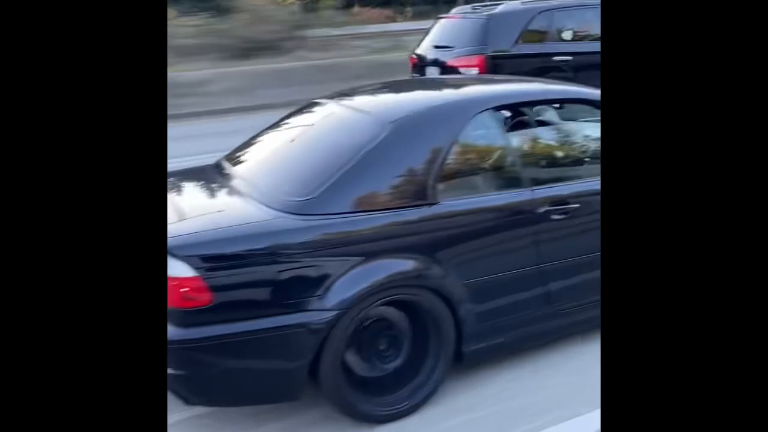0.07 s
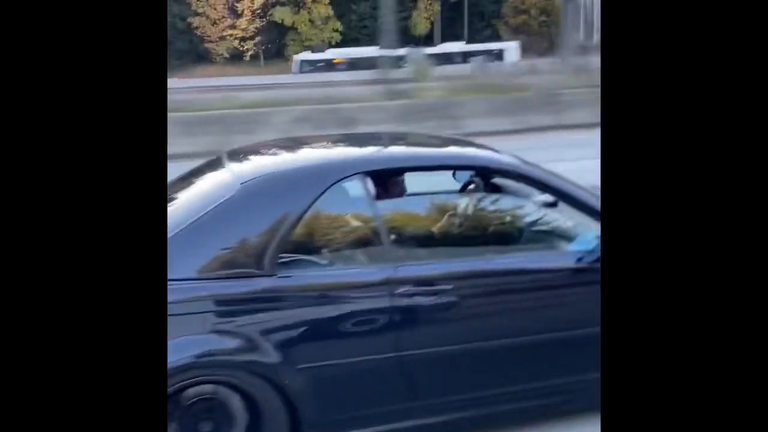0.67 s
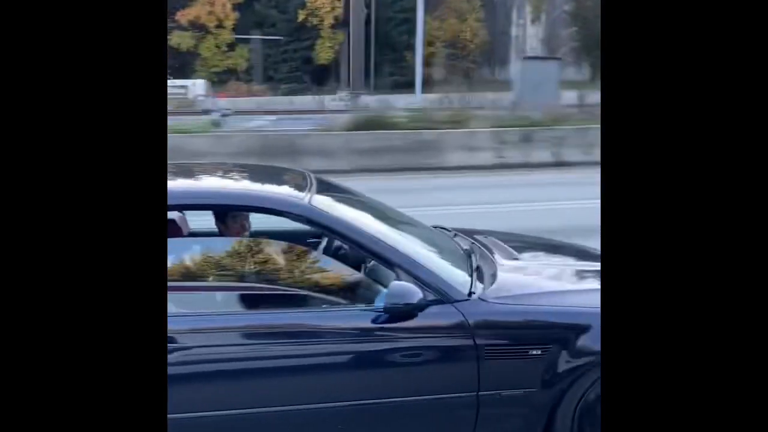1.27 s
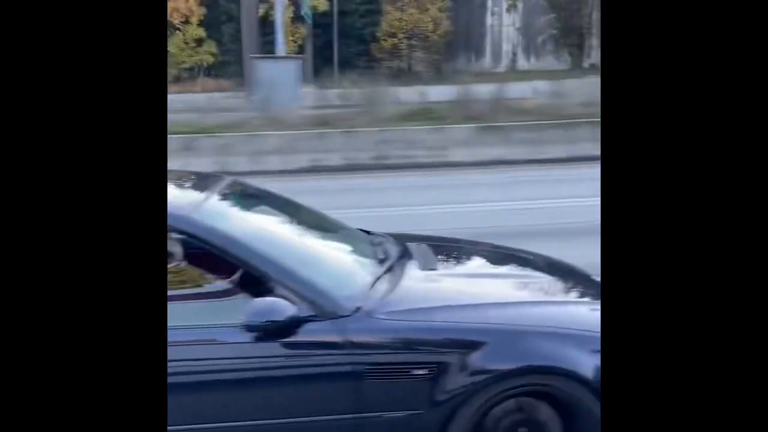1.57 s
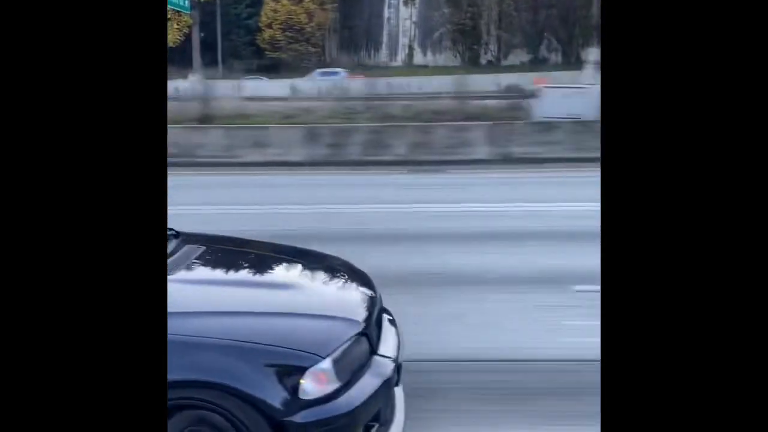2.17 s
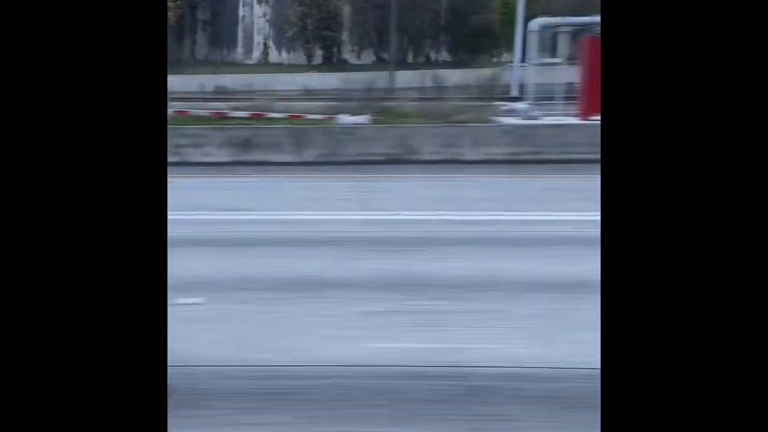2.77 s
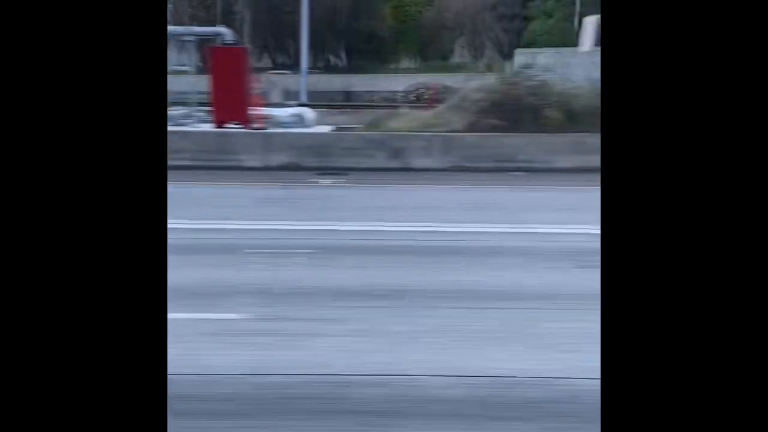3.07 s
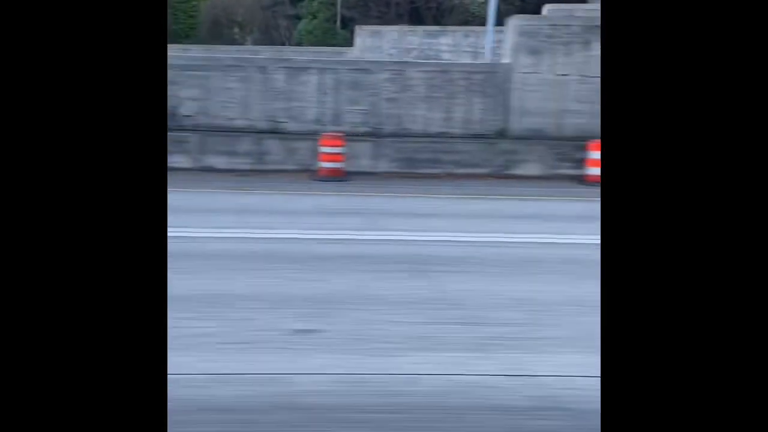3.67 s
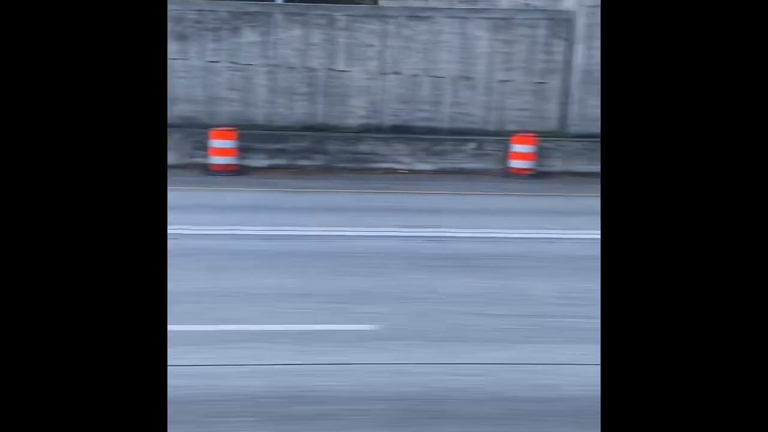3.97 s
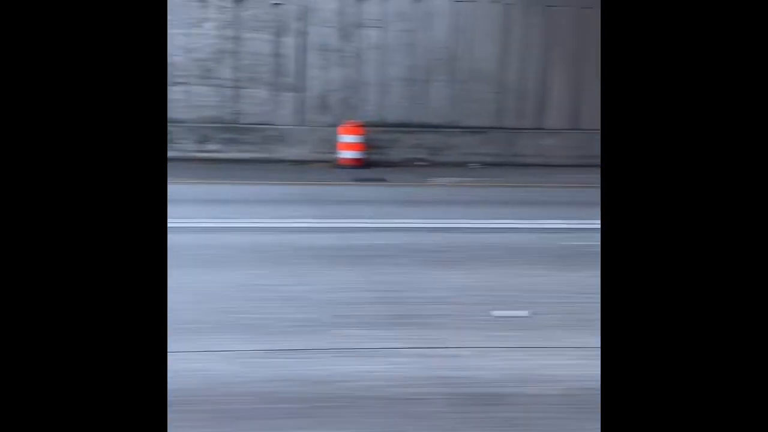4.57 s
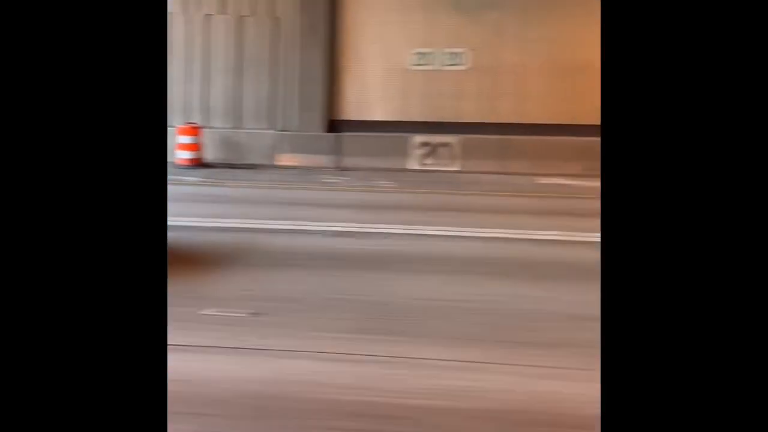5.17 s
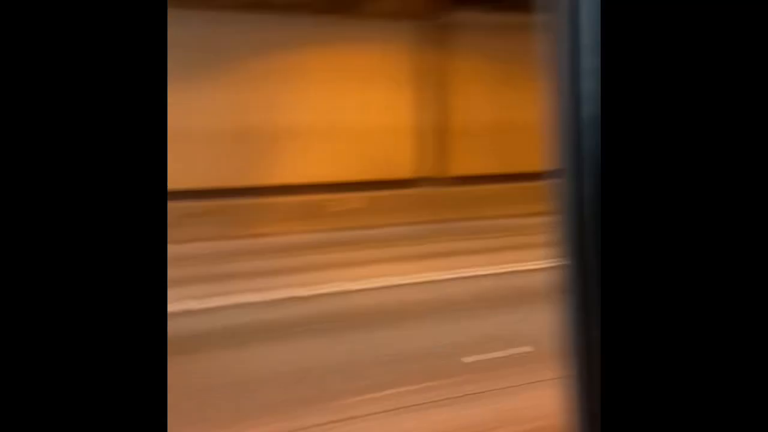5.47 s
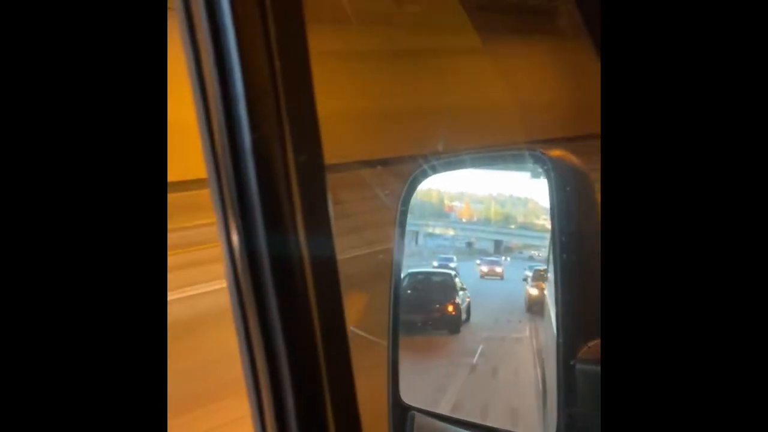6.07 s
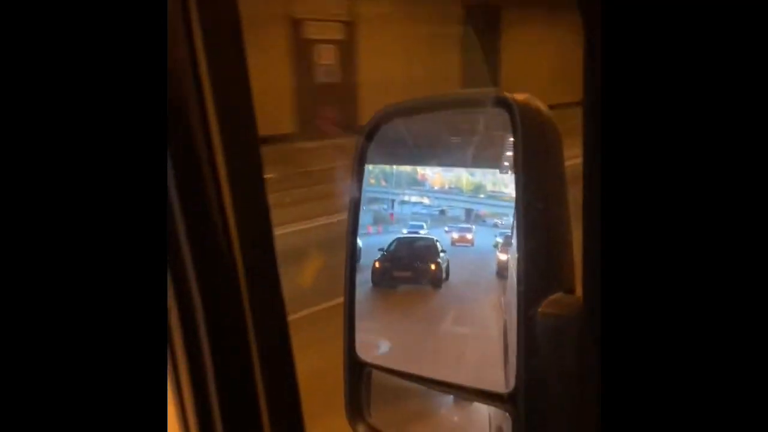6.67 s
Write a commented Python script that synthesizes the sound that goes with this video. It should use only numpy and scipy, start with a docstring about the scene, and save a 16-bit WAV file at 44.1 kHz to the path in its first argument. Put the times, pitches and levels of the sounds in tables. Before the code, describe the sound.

On a highway, heard from the open window of a moving van, a sports car's engine drones alongside over buffeting wind and tyre roar. Its exhaust pops several times, then the throttle blips and more pops follow. The engine sinks to a quiet drone under the road noise. Entering a concrete tunnel, it revs hard, and its raspy note and loud bangs come back off the walls in a long echo.

```python
"""On a highway, microphone at the open window of a van, a six-cylinder sports car running alongside.
Wind beats at the window and tyres roar on concrete. The car's firing pulses drone in its pipe; it blips
the throttle, and unburnt fuel pops on the overrun. Then it revs hard as both enter a concrete tunnel,
where the exhaust gas rasps and the note and the bangs come back off the walls in a long echo."""
import sys
import numpy as np
from scipy import signal
from scipy.fft import rfft, irfft, next_fast_len
from scipy.io import wavfile
from scipy.ndimage import uniform_filter1d

SR = 44100
rng = np.random.default_rng(int(sys.argv[2]) if len(sys.argv) > 2 else 0)


def master_out(mix):
    """Clip the mix to full scale and print it as 16-bit PCM to the path in sys.argv[1]."""
    frames = np.transpose(np.atleast_2d(mix))
    ceiling = np.clip(frames, -1, 1)
    pcm = np.round(ceiling * 32767).astype(np.int16)
    wavfile.write(sys.argv[1], SR, pcm)


N = 301203
T = np.arange(N) / SR

# slow drift of the road noise, before each layer's trim: time_s, wind_db, tyres_db, hiss_db
ROAD_LEVELS = [(0, -25.5, -35, -48.5), (.9, -28, -31, -48.5), (2.4, -32, -36, -55), (2.8, -32, -38, -55),
               (3.6, -31, -38.5, -62), (4, -30, -35, -57), (4.5, -27.5, -33, -59), (5.2, -30, -25, -47),
               (5.7, -42, -31, -49.5), (6.83, -35, -27.5, -56)]
# spectra of the road noise: frequency_hz, level_db
WIND_SPECTRUM = [(15, -8), (28, 8), (42, -1), (80, 2), (110, -4), (200, -6), (320, -8), (600, -25.5),
                 (1500, -75.5)]
TYRE_SPECTRUM = [(100, 6), (220, 8.5), (330, -6.5), (430, -4), (500, 4), (590, -1), (750, 4.5), (880, 3),
                 (1020, 4.5), (1400, -2), (2400, -8), (3200, -23), (5000, -48)]
NEAR_TYRE_SPECTRUM = [(500, -21), (1200, 1), (2400, -3), (3200, -17.5), (5000, -34)]  # the car's own, brighter from close by
HISS_SPECTRUM = [(1000, -3.5), (2700, 12), (4200, 3), (5100, 4.5), (7000, 0), (9000, -3), (12300, -7),
                 (14000, -7.5), (16000, -33.5)]
GUST_SPECTRUM = [(30, -13), (70, 11), (140, -6), (260, -4), (450, -20), (800, -29), (2000, -74)]
# wind straight on the microphone: centre_s, level_db, half_length_s
MIC_GUSTS = [(4.212, -24, 0.035)]

# how much of the engine comes off the tunnel walls: time_s, power_share
TUNNEL_SHARE = [(4.4, 0.02), (4.75, 0.29), (4.95, 0.14), (5.3, 0.42), (6.1, 0.64), (6.4, 0.44),
                (6.83, 0.33)]
# the tunnel's reverberation time: frequency_hz, t60_s
TUNNEL_DECAY = [(100, 1.8), (400, 1.58), (1500, 2.3), (5000, 1.95), (12000, 0.29)]
# swells of a low drone in the tunnel: start_s, length_s, tone_db, octave_db
BOOM_SWELLS = [(5, 0.22, -35, -25.5), (5.3, 1, -32, -37), (6.3, 0.5, -24.5, -30.5)]

# bursts of gas rasp, levels at REFERENCE_FIRING_HZ: start_s, length_s, body_db, sizzle_db
RASP_BURSTS = [(2.45, 0.19, -27.5, -31), (2.66, 0.056, -32.5, -47.5), (2.76, 0.23, -44, -47.5),
               (4.3, 0.77, -38, -52), (4.72, 0.069, -24, -38), (4.765, 0.23, -22.5, -27),
               (4.96, 0.17, -22, -25.5), (5.12, 0.21, -22.5, -33.5), (5.32, 0.96, -23.5, -37),
               (6.32, 0.18, -23, -31), (6.52, 0.34, -21, -29)]
# a few faint narrow rings in the sizzle, against its plain level: pitch_hz, level_db
SIZZLE_PEAKS = [(3070, -9), (3380, -6), (4370, 3), (4540, -18), (5180, -8), (5320, -14), (5480, 0)]
# a high whistle in the hard rev: start_s, length_s, level_db
WHISTLES = [(4.82, .2, -41), (5.04, .11, -35)]
# fuel firing in the pipe: start_s, thump_db, thump_pitch_hz, bark_db, crack_db, decay_s
EXHAUST_POPS = [(0.126, -5.5, 97, -16.5, -52, .01), (.14, -5.5, 78, -25, -48, 0.0089),
                (0.149, -15, 110, -19, -53, 0.013), (0.2085, -4, 121, -19, -48, 0.015),
                (0.219, -16, 108, -20, -44, 0.01), (0.229, -20, 85, -33, -48, 0.014),
                (.393, -14, 87, -21, -48, 0.011), (0.4168, -6.5, 101, -16.5, -52, 0.011),
                (0.457, -10, 88.5, -34, -50, .015), (.65, -12.5, 87, -42, -54, 0.017),
                (2.458, -11.5, 164, -36, -53, 0.018), (2.657, -12, 300, -22, -36, .005),
                (2.853, -10, 163, -23, -37.5, 0.02), (2.866, -3.5, 165, -19.5, -39, 0.016),
                (2.912, -12, 168, -28.5, -40, 0.015), (2.924, -13, 167, -24, -46, .012),
                (3.002, -11, 170, -22, -42, 0.015), (3.016, -8.5, 137, -30, -49, .014),
                (3.052, -12, 136, -33, -39.5, 0.017), (4.211, -10, 203.9, -32, -55, 0.014),
                (4.81, -9, 179, -17, -28, .012), (4.827, 1.5, 202, -16, -23.5, 0.02),
                (5.39, -7, 144, -23, -33, 0.025), (5.424, -4, 138, -31, -30, 0.069),
                (5.45, -4.5, 131, -24, -33, 0.037), (5.475, -20, 124, -20.5, -31, 0.038),
                (5.529, -8, 152, -13, -27.5, 0.018), (5.917, -3.5, 150, -18, -25, 0.04),
                (5.954, -2, 219, -16, -31, 0.037), (5.997, -5, 155, -19, -30, 0.02)]
# spectra of the gas leaving the pipe: frequency_hz, level_db
BODY_SPECTRUM = [(40, -32), (130, -12), (220, -1), (330, 4), (480, 1.5), (650, 5.5), (950, 1), (1500, -4.5),
                 (2500, -5), (4000, -10), (5400, -19.5), (7000, -36), (10000, -69)]
SIZZLE_SPECTRUM = [(1000, -22), (2400, 10.5), (3400, 1), (4600, 4), (5350, 7.5), (6200, 5), (8500, -2),
                   (12000, -9.5), (14000, -19), (16000, -44)]
BARK_SPECTRUM = [(100, -10.5), (400, 13.5), (700, 5), (1200, 1), (1700, -4), (2400, -4), (3000, -29.5),
                 (6000, -35)]
CRACK_SPECTRUM = [(1000, -13), (2500, 4), (4500, 6.5), (6500, 1), (9000, -5), (12000, -8.5), (16000, -25)]

# the engine's firing rate: time_s, rate_hz
FIRING_RATE = [(0, 164.4), (.6, 159.3), (1, 157.7), (1.25, 156.6), (2.43, 149.8), (2.49, 170.4),
               (2.61, 236.8), (2.70, 249.4), (2.95, 217.4), (3.06, 200.9), (4.77, 202.2), (4.83, 212.9),
               (4.9, 256.8), (4.96, 293), (5.03, 330.2), (5.1, 375.7), (5.24, 380.3), (5.35, 311.2),
               (5.55, 295.5), (5.85, 282.3), (6.24, 289.4), (6.35, 312.7), (6.83, 315.8)]
# its unsteadiness, greatest in the hard rev: time_s, rms_share
FIRING_JITTER = [(4.75, 0.0059), (4.88, 0.012), (5.2, 0.01703), (5.6, 0.00797)]
# load, which brightens and roughens the note: time_s, load_share
ENGINE_LOAD = [(0, 0.04), (2.4, 0.29), (2.68, 0.57), (4.7, 0.08), (4.86, 0.96), (5.5, 0.75), (6.83, 0.97)]
# the pipe's overtone colour at light and at full load: frequency_hz, level_db
LIGHT_LOAD_SPECTRUM = [(70, -4), (150, -3), (230, 5.5), (330, 9), (490, -2), (640, -16.5), (725, -10.5),
                       (820, -34.5), (1250, -26), (3000, -37)]
FULL_LOAD_SPECTRUM = [(70, -7.5), (155, -2), (230, -10.5), (330, -2), (480, -3), (590, 0.5), (690, -2),
                      (790, 4.5), (870, -1.5), (970, 1.5), (1200, -16), (2000, -19.5), (3000, -26)]
# the exhaust speaks up: start_s, length_s, tone_db, octave_db, overtones_db
EXHAUST_SURGES = [(0, 0.49, -17, -28, -23), (.48, 0.14, -17.5, -37, -32), (.95, 0.3, -16.5, -42, -33.5),
                  (1.23, 0.19, -16.5, -27.5, -34), (1.42, .24, -18.5, -32.5, -43.5),
                  (1.66, 0.21, -17, -31.5, -50), (1.87, 0.3, -16.5, -43, -46),
                  (2.17, 0.25, -19.5, -46, -50), (2.43, 0.07, -15, -19.5, -17), (2.49, 0.12, -22, -25, -19),
                  (2.565, 0.038, -15, -18, -13.5), (2.65, .04, -20, -28, -26.5),
                  (2.68, 0.26, -23, -38, -36), (2.94, 0.062, -21, -35.5, -43),
                  (3.14, 0.13, -22.5, -49, -43), (3.84, 0.081, -29, -34.5, -42),
                  (4.75, 0.059, -24, -26, -24.5), (4.805, .06, -15, -23, -24),
                  (4.875, 0.047, -19, -23, -14), (4.935, 0.035, -24, -18, -20),
                  (4.995, 0.052, -14.5, -33, -15), (5.06, 0.13, -24, -26.5, -17.5),
                  (5.17, 0.09, -18, -27, -24), (5.28, .17, -23.5, -29.5, -33),
                  (5.46, 0.43, -23.5, -30, -27), (5.95, 0.65, -30, -37, -31.5), (6.32, 0.48, -28, -24, -26)]
# the engine lopes: start_s, length_s, order_0.5_db, order_1.5_db, order_2.5_db
ENGINE_LOPES = [(1.4, 0.26, -45, -32.5, -49), (1.85, 0.92, -50, -44, -43), (2.62, 0.17, -30, -30, -43),
                (4.91, 0.066, -25, -36, -36)]

# stereo width, before each source's own widening: frequency_hz, side_db
STEREO_WIDTH = [(60, -54), (200, -34.5), (400, -19.5), (800, -11.5), (1800, -15.5), (3000, -6.5),
                (4500, -5), (7000, -34), (15000, -26)]
# the sound leans left, most in the tunnel: frequency_hz, full_left_over_right_db
LEFT_LEAN = [(110, .3), (200, -0.2), (380, 4.7), (700, 7.6), (1290, 5.5), (2000, 0), (5000, 0)]
# left and right swing in and out of phase in the treble: frequency_hz, left_lead_rad
TREBLE_PHASE = [(0, 0), (1900, .1), (2700, .7), (5100, .5), (6000, 1.6), (6800, 3), (8000, 3.3),
                (9900, 6.2), (11400, 6.4), (12800, 9.4)]

REFERENCE_FIRING_HZ = 326
RASP_ATTACK_S, RASP_RELEASE_S = 0.05, 0.039
SURGE_ATTACK_S, SURGE_RELEASE_S = 0.029, 0.035


def amp(db):
    """Decibels to gain."""
    return 10 ** (np.asarray(db) / 20)


def unit(x):
    """Scales to rms 1."""
    return x / np.sqrt(np.mean(x ** 2) + 1e-20)


def at_hz(points, hz):
    """Reads a table on a log-frequency axis."""
    f, value = np.transpose(points)
    return np.interp(np.log(hz + 1), np.log(f + 1), value)


def curves(rows):
    """The columns of a time table at every sample."""
    time_s, *columns = np.transpose(rows)
    return [np.interp(T, time_s, column) for column in columns]


def swells(rows, attack_s, release_s):
    """Events rise, hold and die away; one gain curve for each dB column."""
    power = 0
    for start_s, length_s, *levels_db in rows:
        rise = np.clip((T - start_s) / attack_s, 0, 1)
        fall = np.exp(-np.maximum(T - start_s - length_s, 0) / release_s)
        power = power + np.outer(amp(levels_db), rise * fall) ** 2
    return np.sqrt(power)


def shape(x, gain):
    """Filters by a gain given as a function of frequency."""
    size = next_fast_len(N + 4096)
    return irfft(rfft(x, size) * gain(np.fft.rfftfreq(size, 1 / SR)), size)[..., :N]


def wobble(rate_hz):
    """A random waver of rms 1, mostly slower than rate_hz."""
    return unit(shape(rng.standard_normal(N), lambda f: np.exp(-(f / rate_hz) ** 2)))


def narrow_noise(pitch_hz, width_hz):
    """A narrow band of noise that follows a pitch curve."""
    angle = 2 * np.pi * np.cumsum(pitch_hz) / SR
    return wobble(width_hz) * np.cos(angle) + wobble(width_hz) * np.sin(angle)


def spread(pair, wide_db):
    """Two unrelated signals become left and right, near mono in the bass."""
    side = shape(pair[1], lambda f: amp(at_hz(STEREO_WIDTH, f) + wide_db))
    return np.array([pair[0] + side, pair[0] - side])


def noise(spectrum, wide_db=0):
    """Stereo turbulence of rms 1."""
    pair = shape(rng.standard_normal((2, N)), lambda f: amp(at_hz(spectrum, f)))
    return unit(spread(pair, wide_db))


def patchy_bands(x, depth_db, full_from_hz=600):
    """Narrow bands of the noise swell and fade at random."""
    hz, _, bands = signal.stft(x, SR, nperseg=1024)
    patches = rng.standard_normal((bands.shape[-1], len(hz))).T
    for _ in range(2):
        patches = uniform_filter1d(uniform_filter1d(patches, size=3, axis=0), size=15, axis=1)
    gain_db = depth_db * unit(patches) * np.minimum(hz / full_from_hz, 1)[:, None]
    return signal.istft(bands * amp(gain_db), SR, nperseg=1024)[1][:, :N]


def road(wind_trim_db=4, tyre_trim_db=4.5, hiss_trim_db=6.5, abreast_s=0.77, half_pass_s=0.69):
    """Wind beats at the window and sings faintly on its edge; tyres roar on concrete."""
    wind_db, tyres_db, hiss_db = curves(ROAD_LEVELS)
    buffet_db = 2.5 * (wobble(10.2) - 0.5)
    window_edge = amp(-17) * narrow_noise(4950 + 89 * wobble(1.4), width_hz=150)
    # the car's tyres are loudest as the van draws level
    near_tyres = amp(-33) * noise(NEAR_TYRE_SPECTRUM) / (1 + ((T - abreast_s) / half_pass_s) ** 2)
    roar = amp(tyres_db + tyre_trim_db) * noise(TYRE_SPECTRUM)
    hiss = amp(hiss_db + hiss_trim_db) * (noise(HISS_SPECTRUM) + window_edge)
    rush = patchy_bands(roar + near_tyres + hiss, depth_db=1.43)
    wind = amp(wind_db + wind_trim_db + buffet_db) * noise(WIND_SPECTRUM)
    return wind + rush * amp(wobble(23))


def mic_gust(apart=0.32):
    """Eddies brush the microphone and push on each side a little differently."""
    common, side = shape(rng.standard_normal((2, N)), lambda f: amp(at_hz(GUST_SPECTRUM, f)))
    swell = sum(amp(db) * np.exp(-((T - s) / half_s) ** 2 / 2) for s, db, half_s in MIC_GUSTS)
    return swell * unit(np.array([common + apart * side, common - apart * side]))


def tunnel_boom(pitch_hz=82.9, waver=0.0186, swell_db=2):
    """A low wavering drone and its octave build up in the tunnel."""
    cycles = np.cumsum(pitch_hz * (1 + waver * wobble(7.75))) / SR
    gains = swells(BOOM_SWELLS, attack_s=0.043, release_s=0.064)
    return sum(gain * amp(swell_db * wobble(6.3)) * np.sqrt(2) * np.sin(2 * np.pi * k * cycles)
               for k, gain in enumerate(gains, 1))


def tunnel_echo(x, build_s=0.0011):
    """Dense echoes off concrete walls; the high treble dies first."""
    hz, t, bands = signal.stft(rng.standard_normal((2, 3 * SR // 2)), SR, nperseg=256)
    decay = amp(-60 * t / at_hz(TUNNEL_DECAY, hz)[:, None])
    tail = signal.istft(bands * decay * (1 - np.exp(-t / build_s)), SR, nperseg=256)[1]
    echoes = signal.fftconvolve(x[None], tail / np.linalg.norm(tail[0]), axes=1)[:, :N]
    return spread(echoes, wide_db=5)


def barrier_echo(x, delay_s=0.031, echo_db=-11, low_hz=300):
    """The low concrete barrier throws the overtones back; bass bends over it."""
    reflection = lambda f: np.exp(-2j * np.pi * f * delay_s) * f ** 4 / (f ** 4 + low_hz ** 4)
    return amp(echo_db) * shape(x, reflection)


def high_whistle(firing_hz, sag_from_s=4.6, sag_hz_per_s=2900):
    """A high whistle that slides down during the hard rev."""
    pitch_hz = 5260 + 600 * np.log2(firing_hz / REFERENCE_FIRING_HZ)
    pitch_hz -= sag_hz_per_s * np.maximum(T - sag_from_s, 0)
    return swells(WHISTLES, RASP_ATTACK_S, RASP_RELEASE_S)[0] * narrow_noise(pitch_hz, width_hz=460)


def sizzle_rings(f, width_hz=25):
    """Gain that puts a few faint narrow rings in the sizzle."""
    return 1 + sum(amp(db) / (1 + ((f - hz) / width_hz) ** 2) for hz, db in SIZZLE_PEAKS)


def gas_rasp(firings, firing_hz, inside, pulsing=0.056, linger_s=0.2):
    """Gas hisses out in a puff per bank firing; in the tunnel it lingers and echoes fill the gaps."""
    body_gain, sizzle_gain = swells(RASP_BURSTS, RASP_ATTACK_S, RASP_RELEASE_S + linger_s * inside)
    octaves = np.log2(firing_hz / REFERENCE_FIRING_HZ)  # the rasp grows with the revs
    body = body_gain * amp(5 * octaves) * noise(BODY_SPECTRUM, wide_db=4)
    ringing = unit(shape(noise(SIZZLE_SPECTRUM, wide_db=4), sizzle_rings))
    sizzle = sizzle_gain * amp(6.5 * octaves) * ringing
    puffs = 1 + pulsing * (1 - inside) * np.cos(np.pi * firings)
    return patchy_bands(body + sizzle, depth_db=1.8) * puffs * amp(wobble(24))


def fuel_pops(ring_cycles=1.3, rise_s=0.0033, grit_db=1.5):
    """Unburnt fuel fires in the pipe: a short low ring, a hollow bark and a ragged crack."""
    thumps, barks, cracks = np.zeros((3, N))
    for start_s, thump_db, hz, bark_db, crack_db, decay_s in EXHAUST_POPS:
        at = round(start_s * SR)
        t = T[:min(N - at, SR // 3)]
        span = slice(at, at + len(t))
        attack = 1 - np.exp(-t / rise_s)
        burst = attack * np.exp(-t / decay_s)
        thumps[span] += amp(thump_db) * attack * np.sin(2 * np.pi * hz * t) * np.exp(-t * hz / ring_cycles)
        barks[span] += amp(bark_db) * burst
        cracks[span] += amp(crack_db) * burst
    gas = barks * noise(BARK_SPECTRUM)[0] + cracks * noise(CRACK_SPECTRUM)[0]
    return thumps + gas * amp(grit_db * wobble(260))


def engine_lope(firings, rough=0.27):
    """The two banks fall out of balance and half orders grow between the main lines."""
    lope = np.zeros(N)
    for k, gain in enumerate(swells(ENGINE_LOPES, SURGE_ATTACK_S, SURGE_RELEASE_S)):
        half_order = np.sqrt(2) * np.cos(2 * np.pi * ((k + 0.5) * firings + rng.random()))
        lope += gain * half_order * (1 + rough * wobble(30))
    return lope


def pipe_overtones(firings, firing_hz, load, shakes, bank_db=-14, cylinder_db=-24):
    """Harmonics coloured by the pipe; unequal banks add half orders, unequal cylinders add sixths."""
    overtones = np.zeros(N)
    for sixths in [4, 5, *range(7, 12), *range(13, 24), *range(24, 55, 3)]:
        uneven_db = 6 * load + (bank_db if sixths % 3 == 0 else cylinder_db)
        order_db = 0 if sixths % 6 == 0 else uneven_db
        line = np.cos(2 * np.pi * (firings * sixths / 6 + rng.random()))
        hz = firing_hz * sixths / 6
        pipe_db = (1 - load) * at_hz(LIGHT_LOAD_SPECTRUM, hz) + load * at_hz(FULL_LOAD_SPECTRUM, hz)
        overtones += amp(order_db + pipe_db) * line * (1 + shakes[sixths % len(shakes)])
    return overtones


def exhaust_note(firings, firing_hz, inside, throb_db=-13, coast_tone_db=-33, coast_overtones_db=-51):
    """Firing pulses sound a tone, its octave and overtones, sinking to a quiet drone between surges."""
    tone_gain, octave_gain, overtone_gain = swells(EXHAUST_SURGES, SURGE_ATTACK_S, SURGE_RELEASE_S)
    load = curves(ENGINE_LOAD)[0]
    shakes = [0.22 * wobble(26) + 0.25 * wobble(80) for _ in range(7)]  # roughness and burble
    overtones = pipe_overtones(firings, firing_hz, load, shakes)
    waver = 0.028 + 0.65 * inside  # paths off the passing walls beat against each other
    tone = np.cos(2 * np.pi * firings + waver * wobble(40)) * (1 + waver * wobble(29))
    tone += amp(throb_db) * np.cos(np.pi * firings) * (1 + shakes[0])
    octave = np.sin(2 * np.pi * 2 * firings) * (1 + load * shakes[1])
    low_orders = np.hypot(tone_gain, amp(coast_tone_db)) * tone + octave_gain * octave
    return np.sqrt(2) * low_orders + np.hypot(overtone_gain, amp(coast_overtones_db)) * overtones


def scene(open_road_lean=0.26):
    """From the van window the car is heard directly on the open road, largely by echo in the tunnel."""
    firing_hz = curves(FIRING_RATE)[0] * (1 + curves(FIRING_JITTER)[0] * wobble(33.5))
    firings = np.cumsum(firing_hz) / SR
    inside = curves(TUNNEL_SHARE)[0]
    engine = exhaust_note(firings, firing_hz, inside) + engine_lope(firings) + high_whistle(firing_hz)
    bangs = fuel_pops()
    direct = np.sqrt(1 - inside) * engine + bangs
    echoes = barrier_echo(direct) + tunnel_echo(np.sqrt(inside) * (engine + bangs))
    mix = direct + echoes + gas_rasp(firings, firing_hz, inside) + tunnel_boom() + road() + mic_gust()
    leftward = shape(mix, lambda f: amp(np.outer([0.5, -0.5], at_hz(LEFT_LEAN, f))))
    lean = np.minimum(open_road_lean + inside, 1)
    return (1 - lean) * mix + lean * leftward


def record(dry, low_cut_hz=38, high_cut_hz=15500, start_s=0.034):
    """Left and right swing in and out of phase in the treble; peaks are rounded, the band limited."""
    phase_turn = lambda f: np.exp(1j * np.outer([0, -1], at_hz(TREBLE_PHASE, f)))
    low_cut = lambda f: f ** 4 / np.hypot(f ** 4, low_cut_hz ** 4)
    fade_in = np.clip((T - start_s) / 0.004, 0, 1)
    heard = shape(dry, lambda f: phase_turn(f) * low_cut(f)) * fade_in
    rounded = heard / (1 + heard ** 8) ** (1 / 8)
    high_cut = signal.firwin(511, high_cut_hz, window=("kaiser", 9), fs=SR)
    return signal.oaconvolve(rounded, high_cut[None], "same")


dry = scene()
out = record(dry)
master_out(out)
```